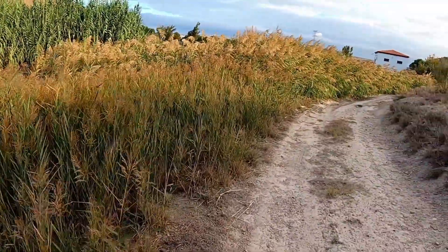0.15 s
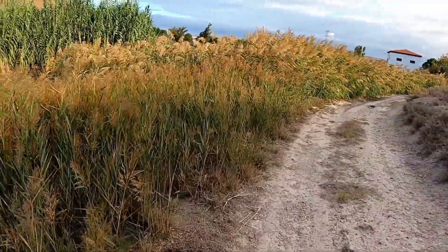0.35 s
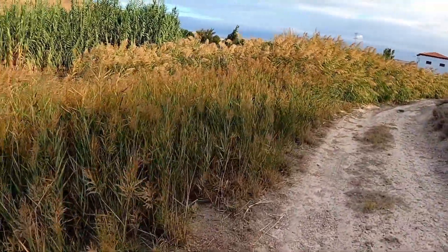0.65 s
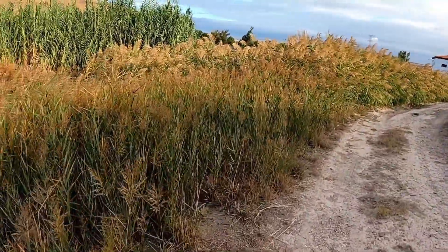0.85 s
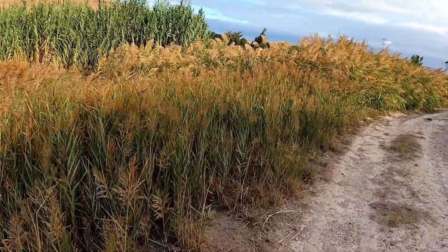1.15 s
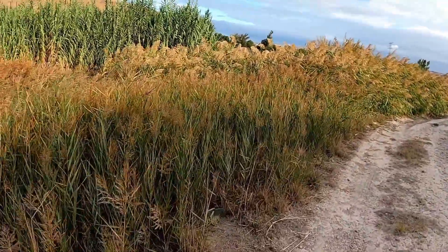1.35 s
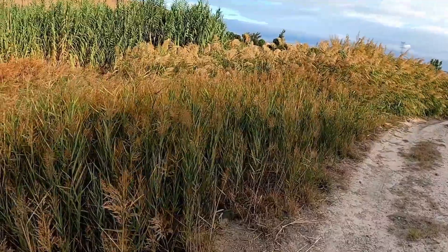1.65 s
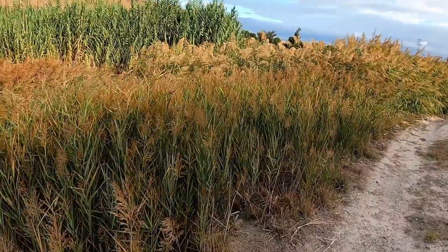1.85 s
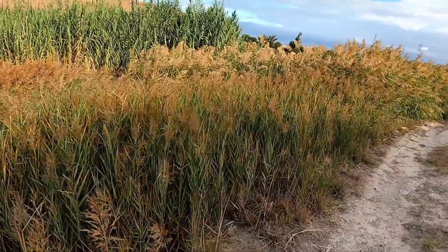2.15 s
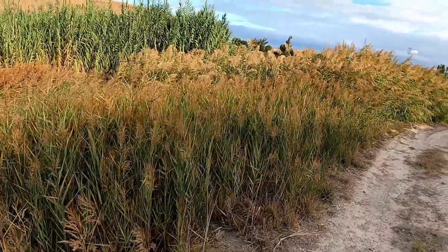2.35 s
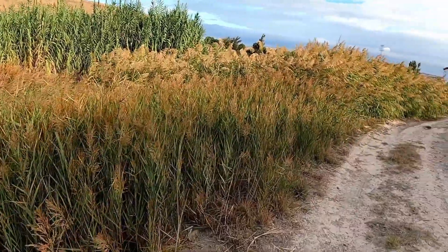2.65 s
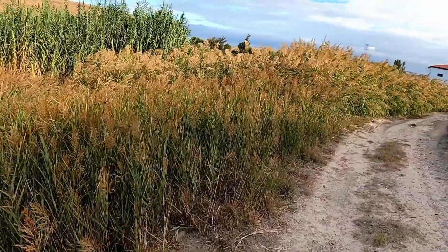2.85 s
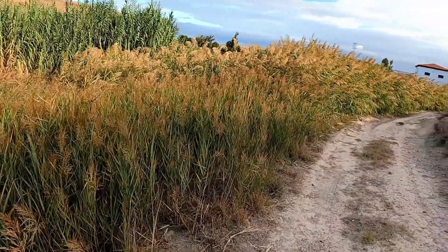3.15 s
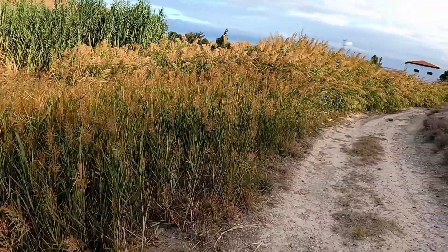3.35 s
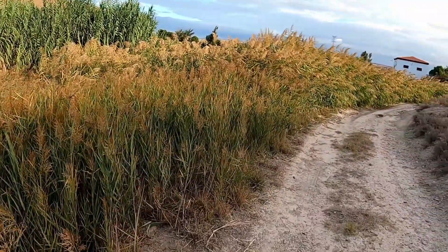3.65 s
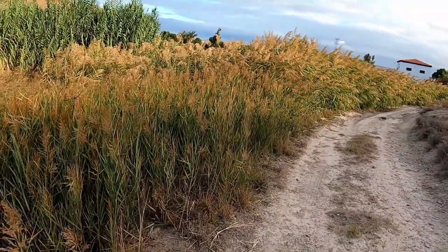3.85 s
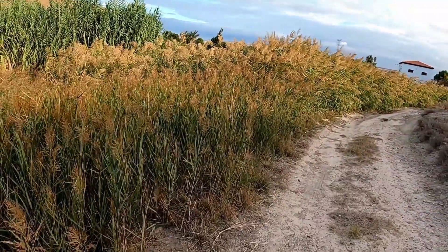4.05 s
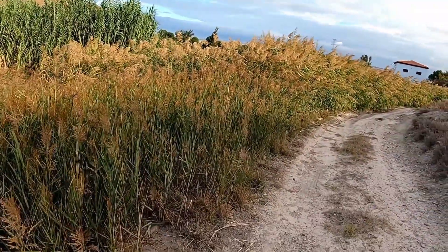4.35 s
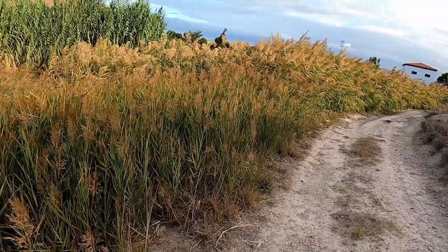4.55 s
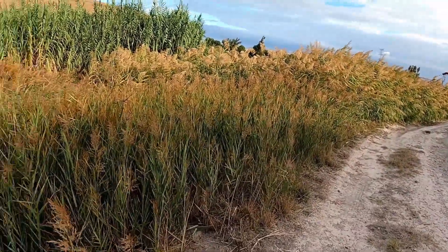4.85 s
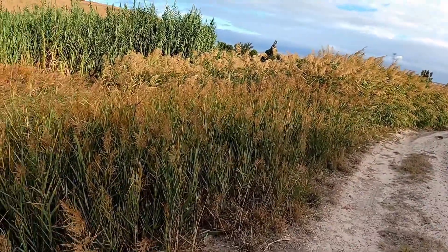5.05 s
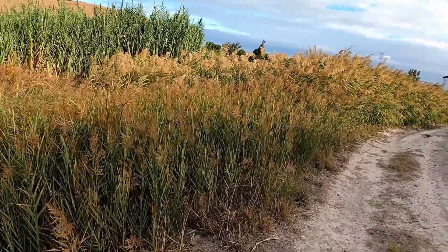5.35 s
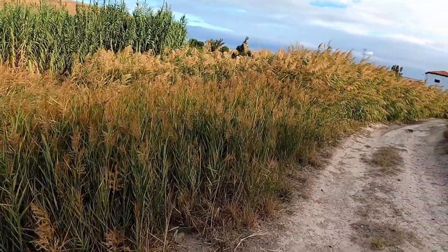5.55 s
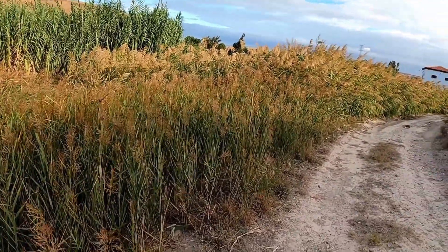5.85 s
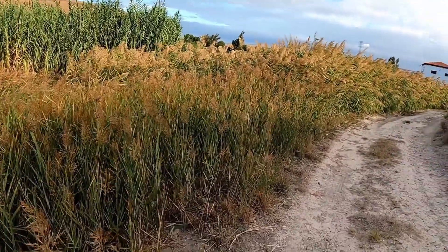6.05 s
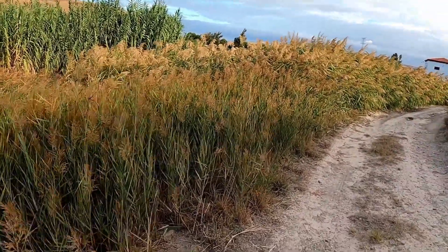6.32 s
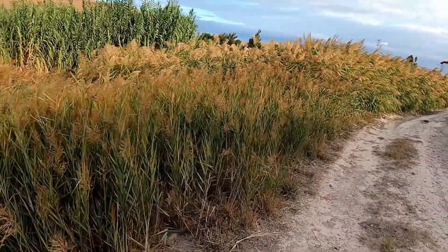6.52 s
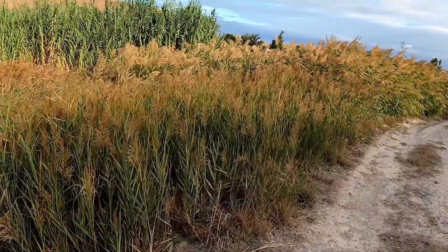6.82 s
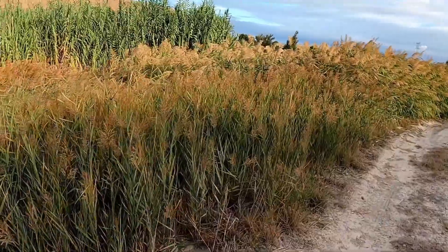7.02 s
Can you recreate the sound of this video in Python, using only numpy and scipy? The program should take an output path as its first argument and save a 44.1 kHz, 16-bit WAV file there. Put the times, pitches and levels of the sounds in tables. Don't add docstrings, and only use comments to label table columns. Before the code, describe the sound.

Young puppies give short, high, thin yips in clusters outdoors while reeds hiss softly, dry stems tick and wind thumps the microphone.

```python
import sys
import numpy as np
from scipy import signal
from scipy.io import wavfile
from scipy.ndimage import uniform_filter1d, map_coordinates

SR = 44100
rng = np.random.default_rng(int(sys.argv[2]) if len(sys.argv) > 2 else 0)


def gain_from_decibels(decibels):
    exponent = np.asarray(decibels, float) / 20
    return 10 ** exponent


def bounce(signal):
    frames = np.transpose(np.atleast_2d(signal))
    limited = np.clip(frames, -1, 1)
    pcm = np.round(limited * 32767).astype(np.int16)
    wavfile.write(sys.argv[1], SR, pcm)


N = 316638
MIRROR = np.array([[1], [-1]])


def rms_one(x):
    return x / np.sqrt(np.mean(x ** 2) + 1e-20)


def evened(x, span_s):
    span = round(span_s * SR)
    power = uniform_filter1d(np.mean(x ** 2, axis=0), span)
    return x / np.sqrt(uniform_filter1d(power, span) + 1e-20)


def in_time(rows, t):
    s, *columns = np.transpose(rows)
    return [np.interp(t, s, c) for c in columns]


def at_hz(points, hz):
    table_hz, value = np.transpose(points)
    return np.interp(np.log(hz), np.log(table_hz), value)


def drift(rate, size=N):
    knots = rng.standard_normal(4000)
    return map_coordinates(knots, [5 + np.arange(size) * 2 * rate / SR % 3990], order=2)


def band(x, low_hz, high_hz):
    return signal.sosfilt(signal.butter(2, [low_hz, high_hz], "band", fs=SR, output="sos"), x)


# f/Hz, likeness 0-1
LIKENESS = [(30, .9), (75, .92), (130, .68), (300, .87), (700, .93), (1300, .85), (9500, .92), (11500, .3),
            (15000, .1)]


def banded_noise(spectrum, edges_hz, patchy_db, tilt=lambda hz: 0):
    out, together = 0, drift(2.7)
    white = rng.standard_normal((2, 2, N))
    for k, (low_hz, high_hz) in enumerate(zip(edges_hz, edges_hz[1:])):
        mid, side = band(white[k % 2], low_hz, high_hz)
        hz = np.sqrt(low_hz * high_hz)
        alike = at_hz(LIKENESS, hz)
        flicker_db = patchy_db * (.5 * together + drift(8.3))
        gain = gain_from_decibels(at_hz(spectrum, hz) + tilt(hz) + flicker_db)
        out = out + gain * (np.sqrt(1 + alike) * mid + np.sqrt(1 - alike) * side * MIRROR)
    return out


# t/s, peak level/dB, half width/s, sharpness/dB
EDDIES = [(.17, -46, 0.035, -16), (.32, -52.5, 0.058, 5), (.58, -47, 0.061, -14), (.88, -36, 0.066, -10),
          (1.053, -24.5, 0.05, -3.5), (1.16, -35.5, 0.066, 2.5), (1.24, -34, 0.016, -22),
          (1.309, -32, 0.019, -27), (1.498, -31, 0.03, -5.5), (1.85, -47, 0.13, -15),
          (2.1, -51.5, 0.23, -3.5), (2.49, -44, 0.023, -7.5), (2.66, -45, 0.13, -7.5),
          (2.98, -35, 0.023, -5.5), (3.15, -42, 0.056, -7), (3.3, -37, 0.049, -0.5),
          (3.471, -35.5, 0.075, -1), (3.721, -37, 0.067, -5), (3.981, -36, 0.051, -3),
          (4.2, -50.5, 0.077, -9.5), (4.4, -45, 0.15, -22), (4.93, -47, 0.038, -23), (5.1, -41, 0.024, -25),
          (5.55, -49, 0.018, -11), (5.9, -52, 0.069, -23), (6.43, -43.5, .05, -20),
          (6.75, -45.5, 0.12, -5.5), (6.95, -44.5, 0.069, -9), (7.12, -49.5, 0.11, -3.5)]


def pressure(t, calm_db, offset_db, sharpens, narrows):
    coarse = t[::64]
    s, db, width_s, sharp_db = np.transpose(EDDIES)[:, :, None]
    peak = gain_from_decibels(db + offset_db + sharpens * sharp_db)
    bells = peak * np.exp(-.5 * ((coarse - s) / (narrows * width_s)) ** 2)
    return np.interp(t, coarse, np.sqrt(gain_from_decibels(2 * calm_db) + np.sum(bells ** 2, axis=0)))


# f/Hz, level/dB per Hz
RUMBLE = [
    (14, -3),
    (30, 5),
    (60, 1),
    (110, -7.5),
    (260, -24.5),
]


def wind(t):
    push = pressure(t, calm_db=-52.5, offset_db=0, sharpens=0, narrows=1.0)
    rumble = evened(banded_noise(RUMBLE, np.geomspace(16, 55, num=4), patchy_db=3.5), 0.054)
    thump = evened(banded_noise(RUMBLE, np.geomspace(55, 110, num=3), patchy_db=3.0), 0.12)
    buffet = evened(banded_noise(RUMBLE, np.geomspace(110, 260, num=4), patchy_db=6.5), 0.12)
    rumble = rumble * push
    thump = thump * pressure(t, calm_db=-62, offset_db=0.22, sharpens=0.97, narrows=0.83)
    buffet = buffet * pressure(t, calm_db=-62.5, offset_db=-8, sharpens=2.6, narrows=0.45)
    lumps_db = 1.5 * drift(9.8)
    pan_db = -.17 * np.clip(20 * np.log10(push) + 54.5, 0, 30)
    return (rumble + thump + buffet) * gain_from_decibels(lumps_db + pan_db / 2 * MIRROR)


# t/s, level/dB
BREEZE = [(0.0, -56.5), (0.3, -60), (1.88, -56.5), (2.14, -57), (2.54, -60), (3.74, -60), (4.04, -61),
          (4.74, -62.5), (5.4, -59.5), (5.88, -63), (6.48, -59), (7.18, -65)]
# f/Hz, level/dB per Hz
REEDS = [(71, -34), (120, -16.5), (150, 2), (188, -0.5), (276, -5), (552, -11), (1240, -4.5), (2240, -9.5),
         (3240, -7), (5270, -10), (7610, -16.5), (8590, -16), (9910, -22.5), (12400, -30.5), (15500, -41.5)]


def reeds(t):
    air_db, = in_time(BREEZE, t)
    air_db = air_db - air_db.mean()
    rustle_db = 1.6 * drift(7.0)

    def tilt(hz):
        follows = 0.75 if hz < 800 else 0.88 if hz < 6000 else 1.13
        return air_db * follows + rustle_db * (hz > 9500)

    edges_hz = 110 * 2 ** np.arange(0, 7.3, 1 / 3)
    hiss = rms_one(banded_noise(REEDS, edges_hz, patchy_db=1.1, tilt=tilt))
    return gain_from_decibels(-47.5) * hiss * gain_from_decibels(0.4 * MIRROR)


# t/s, peak level/dB, f/Hz, width/octaves, decay/s
TICKS = [(2.246, -31.5, 4760, 0.29, 0.0015), (2.29, -29.5, 1940, 2.2, 0.0038),
         (2.312, -33.5, 2680, 1.6, 0.014), (2.5, -36.5, 4800, 0.53, 0.0026), (2.555, -38, 5200, .6, .001),
         (2.769, -30.5, 1360, 0.81, 0.0026), (2.789, -37.5, 2600, 0.32, .006),
         (3.265, -32, 1800, 1.1, .003), (4.223, -39, 3600, 0.65, 0.0062), (4.816, -35, 3000, 2.5, 0.017),
         (5.273, -34, 4630, 2, 0.019), (5.75, -32, 1220, 0.83, 0.0037), (6.028, -31, 2500, 0.96, 0.0049),
         (6.491, -33, 3700, 1.3, 0.015), (6.598, -30, 2500, 0.68, .004), (6.737, -37, 3800, 1.2, 0.0048)]


def ticks():
    out, t = np.zeros((2, N)), np.arange(2048) / SR
    noises = rng.standard_normal((len(TICKS), 2, len(t)))
    for (s, db, hz, octaves, decay_s), (mid, side) in zip(TICKS, noises):
        puff = (mid + 0.42 * side * MIRROR) * np.exp(-t / decay_s)
        puff = band(puff, hz / 2 ** (octaves / 2 + 0.065), hz * 2 ** (octaves / 2 + .05))
        puff = band(puff, 570, 12000)
        at = round(s * SR)
        out[:, at:at + len(t)] += gain_from_decibels(db) * puff / np.abs(puff).max()
    return out


# delay/s, level/dB
ECHOES = [(.005, -3.5), (.009, 11.5), (.016, -1), (.033, -5), (.048, 2.5), (.07, -27), (.095, -17)]


def field(x):
    t60_s, scatter_db = 0.27, 6.5
    t = np.arange(SR // 2) / SR
    decay = gain_from_decibels(-60 * t / t60_s) * np.clip(t / 0.017, 0, 1)
    mid, side = rng.standard_normal((2, len(t))) * decay
    reply = (mid + 0.38 * side * MIRROR) / np.sqrt(np.sum(mid ** 2)) * gain_from_decibels(scatter_db)
    for k, (s, db) in enumerate(ECHOES):
        skew = np.array([k % 3, 2 - k % 3])
        reply[[0, 1], round(s * SR) + skew] += gain_from_decibels(db - 6.5)
    x = signal.lfilter([1, -.8], [.3], x)
    return signal.fftconvolve(x[None], reply, axes=1)[:, :N]


def contour(note, voice, kind):
    start_s, length_s, first_hz, last_hz, crest_db = note
    crest, second_first_db, second_last_db = voice[:3]
    t = np.linspace(0, length_s, num=40)
    crest_s = np.clip(crest, .02, .98) * length_s
    fall_s = min(kind["fall_s"], length_s / 2)
    climb = np.clip(t / (length_s - fall_s), 0, 1) ** kind["bend"]
    drop = np.clip((t - length_s + fall_s) / fall_s, 0, 1) ** 2.6
    pitch_hz = (first_hz + (last_hz - first_hz) * climb) * (1 - kind["fall"] * drop)
    swell_db = 20 * kind["swell"] * np.log10(np.clip(t / crest_s, .03, 1))
    release_db = 20 * np.log10(np.clip((length_s - t) / kind["release_s"], .1, 1))
    sag_db = kind["sag_db_per_s"] * np.maximum(t - crest_s, 0)
    level_db = crest_db + swell_db + release_db - sag_db
    second_db = second_first_db + (second_last_db - second_first_db) * t / length_s
    return np.transpose([start_s + t, pitch_hz, level_db, second_db])


# f/Hz, level/dB
THROAT = [(1500, -15.5), (2600, 17), (3100, 7), (3900, -24), (4600, -14.5), (5600, -8.5), (7000, -44)]
REGISTER_HZ = 1500


def yip(rows, third_db, half_db, rough, start_phase):
    t = np.arange(round(rows[0][0] * SR), round(rows[-1][0] * SR)) / SR
    s, hz, level_db, second_db = np.transpose(rows)
    pitch_hz = np.interp(t, s, hz)
    level = np.interp(t, s, gain_from_decibels(level_db))
    second = np.interp(t, s, gain_from_decibels(level_db + second_db))
    strain = 1.43 * np.linspace(.25, 1, len(t)) ** 1.31

    jitter = 1 + 0.099 * rough * strain * drift(205.4, size=len(t))
    phase = start_phase + 2 * np.pi * np.cumsum(pitch_hz * jitter) / SR
    shimmer = [1 + share * rough * strain * drift(146.0, size=len(t)) for share in (0.4, 0.74, 7.2, 2.6)]
    wave = level * shimmer[0] * np.sin(phase) + second * shimmer[1] * np.sin(2 * phase)

    upper = sum(gain_from_decibels(at_hz(THROAT, k * pitch_hz)) * np.sin(k * phase) for k in range(3, 6))
    low_drive = np.sqrt(level * np.minimum(second, 0.3 * level))
    drive = np.where(pitch_hz > REGISTER_HZ, level, low_drive)
    wave += drive * gain_from_decibels(third_db) * shimmer[2] * upper

    low_half = np.clip((pitch_hz - 1400) / 300, 0, 1)
    halves = low_half * np.sin(phase / 2) + (1 - 0.19 * low_half) * np.sin(3 * phase / 2)
    halves += 0.3 * np.sin(5 * phase / 2)
    wave += level * gain_from_decibels(half_db) * strain * shimmer[3] * halves

    air = rng.standard_normal(SR // 8)[:len(t)] * (1 + np.sin(phase))
    rasp = band(air, 1900, 2700) + 1.3 * band(air, 3100, 3620)
    rasp += 0.29 * band(air, 3280, 4060) + 0.24 * band(air, 5300, 5500)
    wave += np.maximum(level, second) * gain_from_decibels(-14.5) * rough * strain * rms_one(rasp)
    edge = np.clip(np.minimum(t - t[0], t[-1] - t) / 0.0012, 0, 1)
    return wave * edge, phase


# t/s, length/s, rate/Hz, depth 0-1
FLUTTERS = [
    (3.412, .016, 295, 0.26),
    (3.727, 0.021, 260, .55),
    (4.06, 0.03, 231, 0.45),
    (6.237, 0.053, 340, 0.43),
]


def flutter():
    gain = np.ones(N)
    for s, length_s, rate_hz, depth in FLUTTERS:
        t = np.arange(round(length_s * SR)) / SR
        beat = np.sin(2 * np.pi * rate_hz * t + 0.8 * drift(40.0, size=len(t)))
        at = round(s * SR)
        gain[at:at + len(t)] += depth * beat * np.sin(np.pi * t / length_s) ** .5
    return gain


# crest place 0-1, second harmonic first/dB, last/dB, roughness 0-1, echo level/dB
PEEPS = [
    (1.898, 0.04, 1783, 1943, -13),
    (4.597, 0.1, 1178, 1830, -35),
]
PEEP_VOICE = [(.65, -21, -17.5, 0.11, -23.5), (.7, 0, -44, 0.13, -22)]
PEEP = dict(swell=0.49, sag_db_per_s=404, release_s=0.0041, bend=0.57, fall_s=0.0058, fall=-.01,
            third_db=-42, half_db=-41)
BARKS = [
    (0.217, .035, 945, 996, -18),
    (3.379, 0.031, 894, 1013, -13.5),
    (3.696, 0.02, 900, 1078, -24.5),
    (4.03, 0.031, 898, 1039, -11.5),
    (4.358, 0.02, 792, 903, -24.5),
    (4.56, 0.042, 700, 905, -32),
    (4.89, 0.047, 786, 921, -34.5),
    (5.387, 0.022, 961, 832, -26),
    (6.195, .033, 804, 986, -15),
]
BARK_VOICE = [(0.34, -5, -13, 0.29, -18), (0.8, -3, -32, 0.082, -25.5), (0.55, 7.5, 2, 0.11, -11),
              (0.53, -26, -9.5, 0.09, -20.5), (0.87, 5, 1.5, 0.25, -22), (0.29, -18, -5, .15, -26),
              (0.22, -17, 5, 0.23, -26), (0.22, -3.5, 0, 0.27, -16.5), (0.9, -30, -18, 0.12, -16.5)]
BARK = dict(swell=1, sag_db_per_s=153, release_s=0.0053, bend=1.466, fall_s=0.0044, fall=-.01,
            third_db=-26.5, half_db=-39)
CRACKS = [(0.244, 0.028, 992, 1059, -18.5), (3.407, 0.024, 1031, 1200, -17),
          (3.712, 0.041, 1044, 1300, -23), (4.058, 0.028, 1078, 1318, -14.5),
          (4.374, 0.0097, 884, 1235, -18.5), (4.38, .018, 1226, 1390, -16.5),
          (5.404, 0.019, 848, 1033, -32), (6.223, 0.0253, 988, 1020, -20.5)]
CRACK_VOICE = [(.75, 2, -2, 0.39, -19), (0.22, -8, -11, 0.45, -26), (0.62, -6, -9, 0.45, -22),
               (0.96, -12.5, -11, 0.15, -25), (.7, -2, -6, 0.2, -20), (.2, -12, -24, 0.085, -22),
               (0.52, 8, 8, 0.15, -16.5), (0.2, -11, -8, 0.37, -19.5)]
CRACK = dict(swell=0.38, sag_db_per_s=143.5, release_s=0.0042, bend=0.663, fall_s=0.0021, fall=-.05,
             third_db=-21.5, half_db=-31)
HOOKS = [
    (0.27, 0.055, 1736, 1958, -14),
    (3.428, 0.055, 1750, 2027, -17),
    (3.748, 0.052, 1837, 1959, -13),
    (4.085, 0.052, 1794, 1972, -15.5),
    (4.397, 0.074, 1704, 1909, -17),
]
HOOK_VOICE = [(1, -24, -22, 0.19, -22.5), (0.15, -24, -17.5, 0.22, -24), (.08, -49, -25, .02, -28),
              (0.76, -41, -29, .05, -27), (0.6, -16.5, -46, 0.04, -21.5)]
HOOK = dict(swell=0.067, sag_db_per_s=76, release_s=0.0067, bend=0.504, fall_s=0.018, fall=0.3,
            third_db=-39, half_db=-42)
WHINES = [(1.868, 0.031, 1860, 2067, -39), (4.466, .018, 1790, 990, -31), (4.739, .012, 2100, 2250, -35),
          (4.935, 0.078, 1686, 2015, -24.5), (6.306, 0.051, 1196, 1716, -28.5),
          (6.582, 0.037, 1138, 1692, -26.5), (6.64, 0.019, 1926, 2117, -21),
          (6.889, 0.036, 1776, 2122, -21)]
WHINE_VOICE = [(.9, -40, -40, 0.082, -25), (.05, -36, -51, .08, -16), (0.48, -41, -29, 0.088, -29),
               (0.77, -19, -23.5, 0.067, -19.5), (0.3, -5, -30, 0.17, -19), (1, -18, -2, 0.12, -21),
               (0.16, -39, -35, 0.34, -25), (0.24, -42, -38, 0.11, -18.5)]
WHINE = dict(swell=0.92, sag_db_per_s=250, release_s=0.0058, bend=.7, fall_s=0.0053, fall=.01,
             third_db=-42.5, half_db=-33.5)
CHIRPS = [
    (4.682, 0.035, 1720, 1804, -23.5),
    (6.61, 0.042, 1638, 1738, -13.5),
    (6.855, 0.051, 1544, 1807, -16.5),
]
CHIRP_VOICE = [(0.5, -17, -5.5, 0.1, -23), (0.54, -1, -34.5, 0.11, -21.5), (0.34, -3, -33, 0.14, -15.5)]
CHIRP = dict(swell=1.07, sag_db_per_s=251, release_s=0.0043, bend=0.38, fall_s=0.0041, fall=-.02,
             third_db=-44.5, half_db=-45.5)
STRAINS = [
    (5.422, 0.03, 1727, 1829, -26.5),
    (6.243, 0.043, 1830, 1796, -30),
]
STRAIN_VOICE = [(0.5, -12, -3.5, 0.1, -24), (0.3, -15, -8, 0.38, -15.5)]
STRAIN = dict(swell=0.3, sag_db_per_s=60, release_s=0.0045, bend=0.95, fall_s=0.0059, fall=0.01,
              third_db=-56, half_db=-26)
ARCHES = [
    (2.016, .045, 998, 1242, -18),
]
ARCH_VOICE = [(.55, -14, -10.5, 0.11, -27.5)]
ARCH = dict(swell=0.53, sag_db_per_s=250, release_s=0.0037, bend=0.76, fall_s=0.0149, fall=0.24,
            third_db=-17, half_db=-44)
SURGES = [
    (4.713, 0.03, 1790, 1845, -12.5),
    (5.444, .049, 1800, 1760, -16),
    (6.345, 0.039, 1680, 2000, -19),
    (6.29, 0.012, 1870, 1800, -21),
]
SURGE_VOICE = [(0.45, -29, -25, .04, -25), (0.63, -21.5, -14.5, .12, -15.5), (0.39, -18, -26, 0.14, -25),
               (.45, -25, -27, .15, -20)]
SURGE = dict(swell=0.55, sag_db_per_s=58, release_s=0.0057, bend=0.98, fall_s=0.0034, fall=.01,
             third_db=-43, half_db=-45)
SAG = dict(swell=0.5, sag_db_per_s=150, release_s=0.0097, bend=.9, fall_s=.018, fall=0.19,
           third_db=-37, half_db=-28)
REPERTOIRE = [(PEEPS, PEEP_VOICE, PEEP), (BARKS, BARK_VOICE, BARK), (CRACKS, CRACK_VOICE, CRACK),
              (HOOKS, HOOK_VOICE, HOOK), (WHINES, WHINE_VOICE, WHINE), (CHIRPS, CHIRP_VOICE, CHIRP),
              (STRAINS, STRAIN_VOICE, STRAIN), (ARCHES, ARCH_VOICE, ARCH),
              (SURGES[::2], SURGE_VOICE[::2], SURGE), (SURGES[1::2], SURGE_VOICE[1::2], SAG)]
# t/s, L-R level/dB
BEARING = [(0, 0), (1.9, -.5), (2.03, -2.5), (4.45, -4), (4.72, 2), (4.95, -4), (5.45, -4), (6.3, 2),
           (6.62, 3), (6.92, -1)]
# t/s, level/dB
BANK = [(0.25, -17), (.3, -10), (1.9, -15.5), (2.03, -20), (3.4, -24), (3.46, -19), (3.75, -21),
        (4.08, -15.5), (4.42, -14), (4.6, -20), (4.73, -8.5), (4.97, -17), (5.4, -20), (5.47, -12.5),
        (6.22, -18), (6.36, -13), (6.63, -12.5), (6.9, -9.5)]


def puppies(t):
    bank_s, left_lag_s = .022, 3.5e-5
    third_db_per_rough, halves_db_per_rough = 85.5, 33
    direct, sent, cycle = np.zeros((2, N)), np.zeros(N), np.zeros(N)
    sung = [(row, voice, kind) for notes, voices, kind in REPERTOIRE for row, voice in zip(notes, voices)]
    for row, voice, kind in sorted(sung, key=lambda note: note[0][0]):
        rough, echo_db = voice[3:]
        at = round(row[0] * SR)
        pan_db, = in_time(BEARING, row[0])
        third_db = kind["third_db"] + third_db_per_rough * rough * (row[2] > REGISTER_HZ)
        half_db = kind["half_db"] + halves_db_per_rough * rough
        note, phase = yip(contour(row, voice, kind), third_db, half_db, rough, cycle[at])
        end = at + len(note)
        cycle[at:end] = phase
        direct[:, at:end] += note * gain_from_decibels(pan_db / 2 * MIRROR)
        sent[at:end] += note * gain_from_decibels(echo_db)
    throb = flutter()
    direct, sent = direct * throb, sent * throb

    bank_db, = in_time(BANK, t)
    bank = np.roll(direct[::-1] * gain_from_decibels(bank_db), round(bank_s * SR), axis=1)
    bank = signal.lfilter([1, -.95], [.28], bank)
    direct[0] = map_coordinates(direct[0], [np.arange(N) - left_lag_s * SR], order=3)
    return direct + bank + field(sent)


def scene():
    t = np.arange(N) / SR
    return wind(t) + reeds(t) + ticks() + puppies(t)


def band_limit(x):
    return signal.sosfilt(signal.butter(12, 15720, fs=SR, output="sos"), x)


def record(dry):
    cut = signal.cheby2(12, 60, 16100, fs=SR, output="sos")
    mix = signal.sosfilt(cut, dry)
    return band_limit(mix)


dry = scene()
out = record(dry)
bounce(out)
```